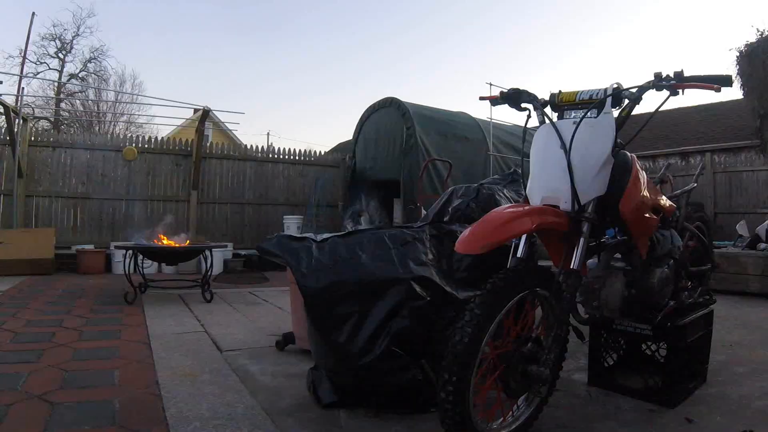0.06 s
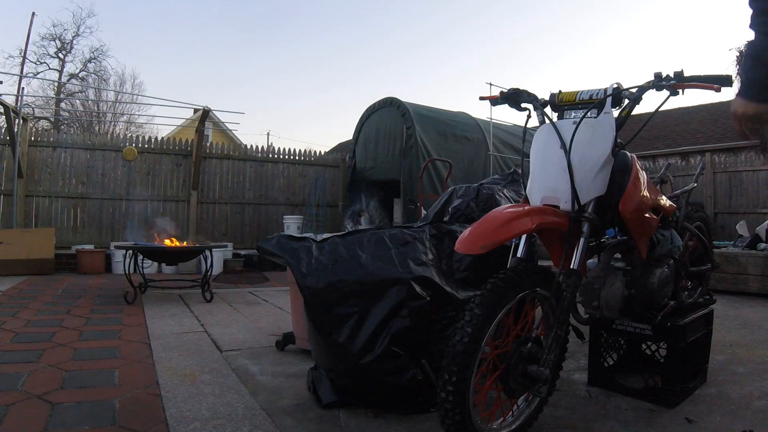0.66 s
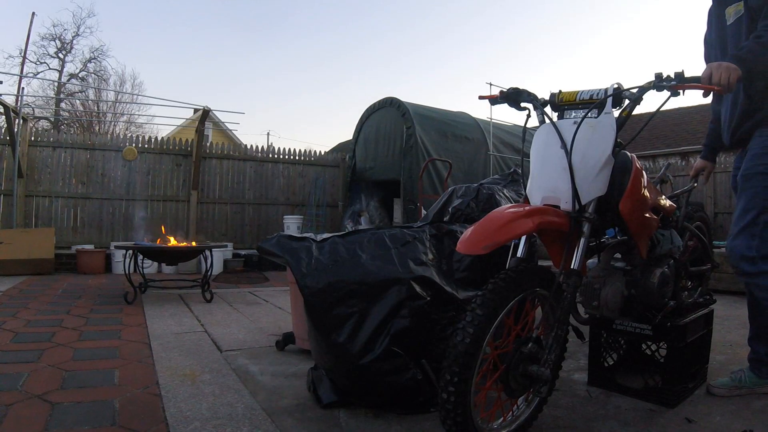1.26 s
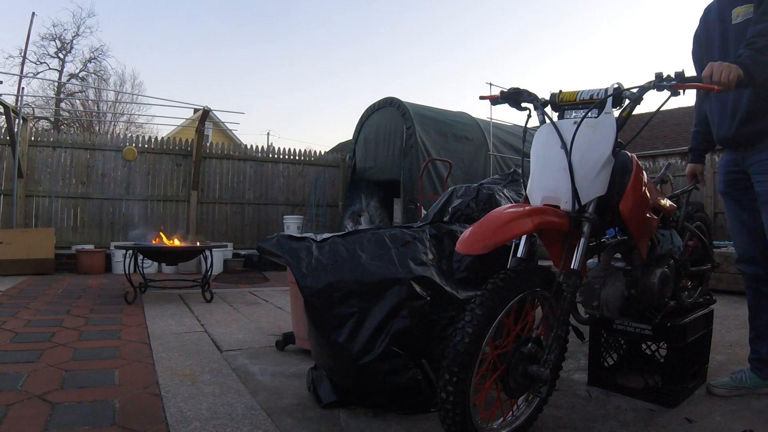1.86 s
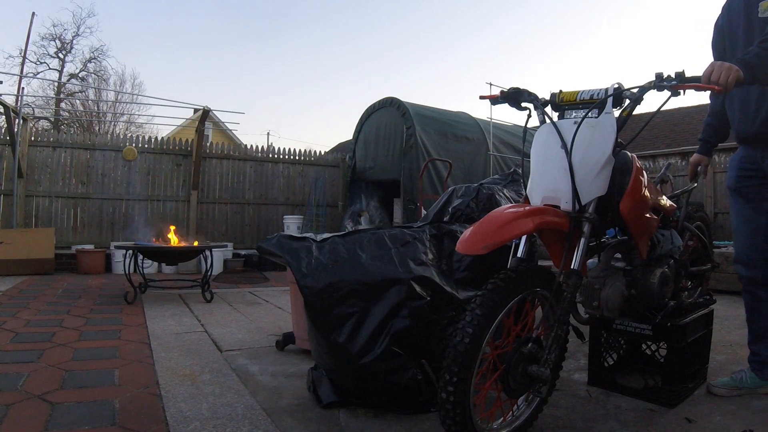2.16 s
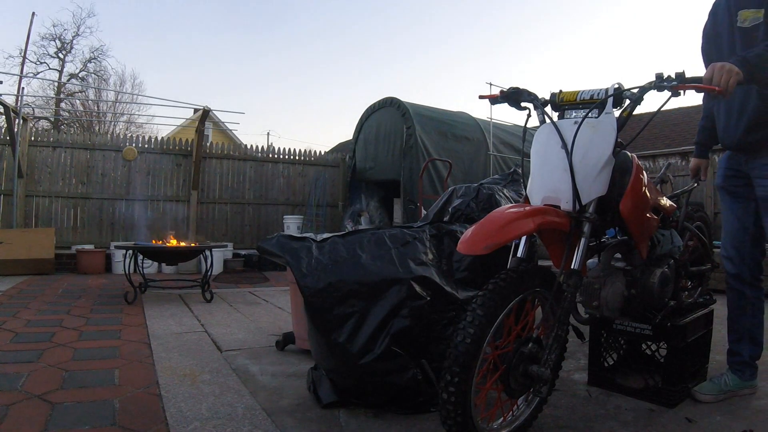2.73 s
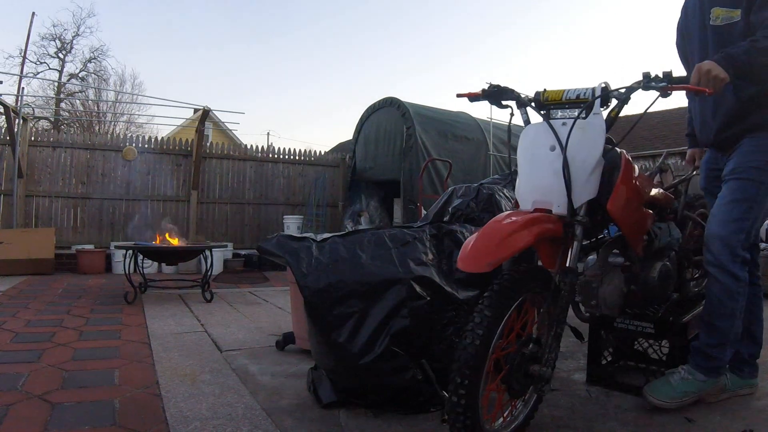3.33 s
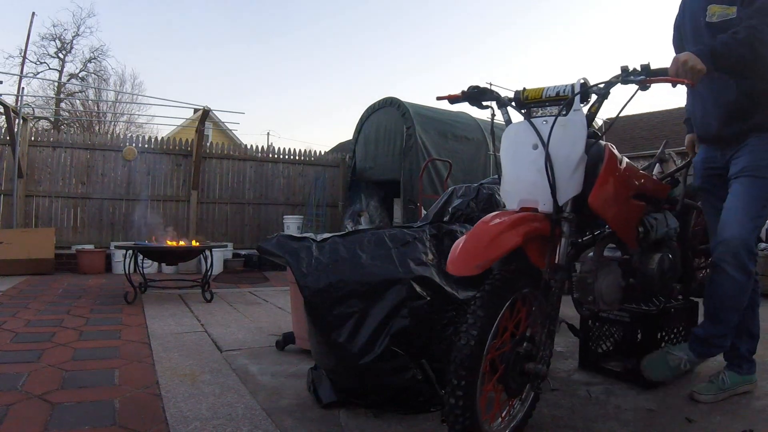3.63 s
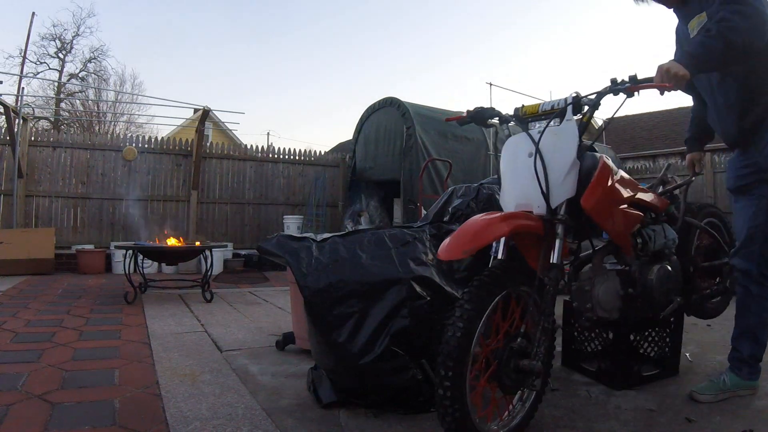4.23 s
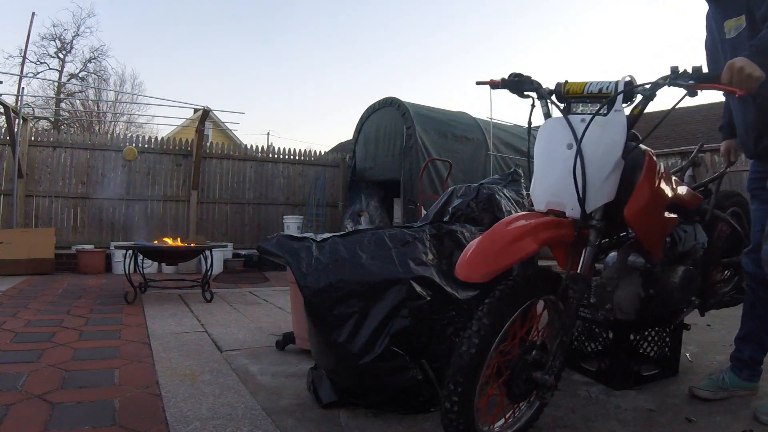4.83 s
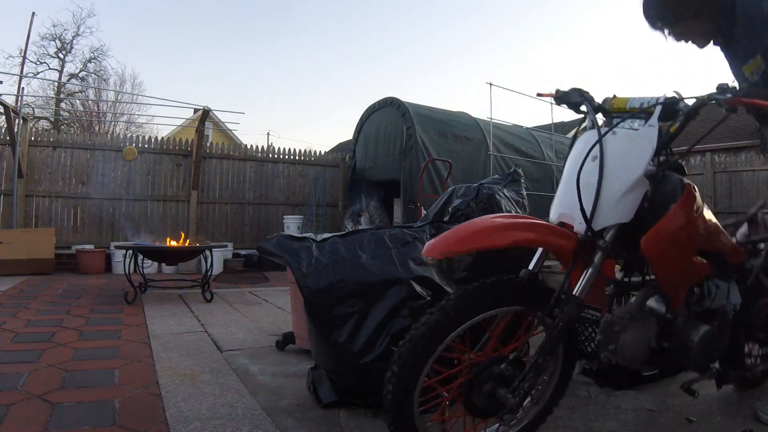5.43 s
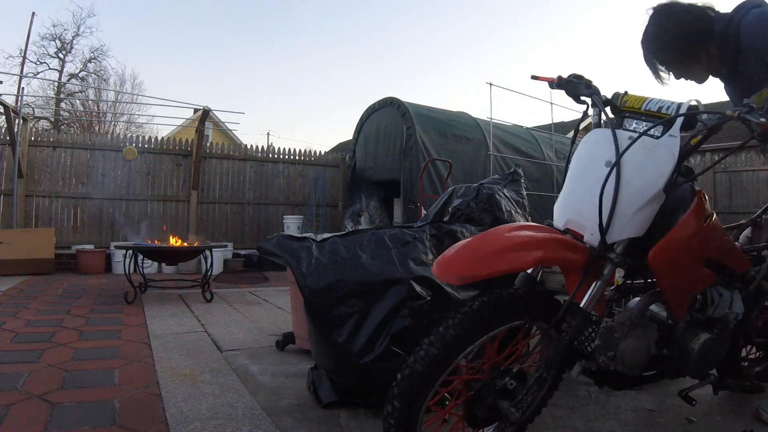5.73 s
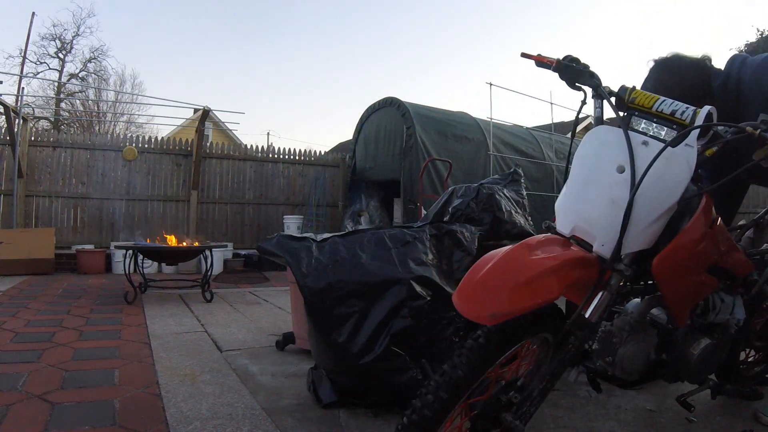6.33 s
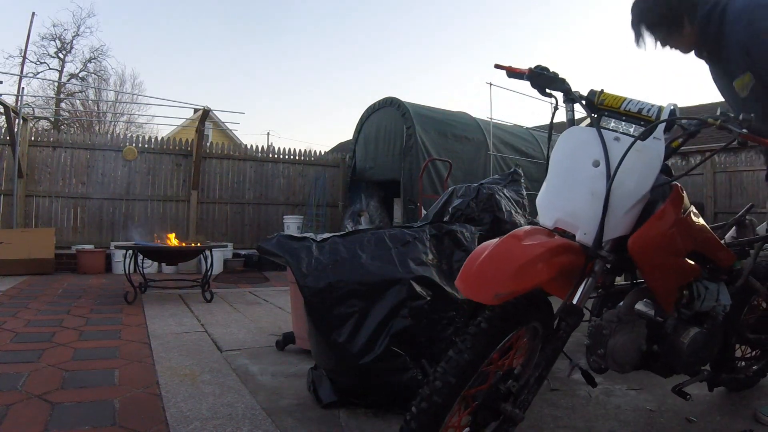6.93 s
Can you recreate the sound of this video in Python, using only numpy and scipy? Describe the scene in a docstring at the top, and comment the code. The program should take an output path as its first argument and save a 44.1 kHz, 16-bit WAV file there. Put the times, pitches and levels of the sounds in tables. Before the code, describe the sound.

A brief low bump of wind hits the microphone, then quiet yard air fades up. A hollow plastic crate is kicked and clatters from edge to edge on paving. A small dirt bike's frame clunks down on it. Shoes scuff on grit, the tyres land with a soft thump and loose metal jingles. Finally the crate is dragged with a juddering scrape and a few knocks.

```python
"""In a paved yard, a small dirt bike is lifted and a plastic crate is kicked, rocked and dragged out.
Wind bumps the microphone first; after a short silence comes a soft pop and the yard air fades up.
Shoes scuff on grit. The hollow crate rings when knocked and judders as it slides on the paving.
The bike's frame clunks on the crate, the tyres land with a dull thump and loose metal jingles."""
import sys
import numpy as np
from scipy import signal
from scipy.fft import rfft, irfft, next_fast_len
from scipy.io import wavfile

SR = 44100
rng = np.random.default_rng(int(sys.argv[2]) if len(sys.argv) > 2 else 0)


def transcribe(u):
    """Save the signal u as a 16-bit wav file named by the first command-line argument.

    u: samples, shape (n,) or (channels, n), limited to [-1, 1]; the rate is SR.
    q: integer samples, one column per channel.
    """
    v = np.clip(np.atleast_2d(u).T, -1, 1)
    q = np.round(v * 32767).astype(np.int16)
    wavfile.write(sys.argv[1], SR, q)


N = 316638
TIME = np.arange(N) / SR  # seconds since the scene began
AGE = np.arange(int(.45 * SR)) / SR  # seconds since one hit began

# Levels are relative: each sound sets its own volume. t60 is the time taken to die away by 60 dB.
# How strong each pitch is in a noise (f/Hz, level/dB):
WIND_SPECTRUM = [(6, -9), (14, 6.5), (24, 7), (42, -5.5), (62, -16), (110, -30), (170, -26.5), (220, -41),
                 (290, -19.5), (350, -26.5), (450, -30.5), (600, -40), (1500, -54), (4300, -66),
                 (5900, -60.5), (6500, -51.5), (7200, -57), (10500, -67.5), (14000, -60)]  # wind on the microphone
YARD_SPECTRUM = [(15, -47), (25, -3), (48, -0.5), (97, -12), (128, -9.5), (162, -18), (200, -17.5),
                 (243, -20), (387, -18), (543, -27), (2210, -35), (2620, -35.5), (4000, -41), (5200, -61),
                 (8800, -120)]  # outdoor air
HISS_SPECTRUM = [(3400, -11), (4200, -17.5), (5200, -10), (5900, -12), (6300, -1.5), (6550, 1.5),
                 (7100, -6), (8500, -9), (10500, -19), (13500, -7.5)]  # microphone hiss
SNAP_SPECTRUM = [(500, 4), (1800, -15.5), (3200, -17), (4200, -8), (5500, 5), (6400, 5), (7500, -5.5),
                 (10500, -12.5), (14000, -47)]  # a sharp crack
GRIT_SPECTRUM = [(500, -11.5), (1800, -3), (3200, -2.5), (4200, -9), (5500, 4), (6400, -0.5), (7500, -10),
                 (10500, -21), (14000, -48)]  # crunching grit
CLATTER_SPECTRUM = [(100, -15.5), (180, 0.5), (250, -4), (340, -0.5), (620, 5.5), (1000, -5.5),
                    (1500, -2.5), (2500, -13), (4200, -22), (5500, -7), (6400, -15), (7500, -17),
                    (10500, -29), (14000, -60)]  # the noisy part of a hit
# rubber rubbing on paving
RUB_SPECTRUM = [(200, 3.5), (600, -2.5), (2000, 0), (3300, -3), (4500, -21.0), (8000, -44)]
# the crate's rim scraping
RASP_SPECTRUM = [(120, -19), (185, 7.5), (250, -2.5), (340, 1), (470, -8.5), (620, -3), (830, 2.0),
                 (1020, 0.0), (1450, -4), (1900, -4.5), (2300, -9.5), (2800, -15.5), (4000, -20.5),
                 (6000, -54)]

# Pitch ranges (lowest f/Hz, highest f/Hz):
AIR_RANGES = [(20, 130), (130, 3500), (3500, 15000)]  # rumble, murmur, hiss
HIT_RANGES = [(90, 450), (450, 1000), (1000, 3500), (3500, 14000)]  # low, middle, upper and treble parts of a hit

# The notes a thing rings with when struck (f/Hz, level/dB, t60/s):
CRATE_NOTES = [(168.4, -2.5, 0.26), (192, -3.5, 0.49), (332.7, 2, 0.28), (353.7, -8.5, 0.42),
               (455, -18, 0.35), (474.5, -4.5, 0.2), (507, -11.5, 0.35), (573, -15, 0.074),
               (603.5, 7, 0.28), (626, 3, 0.24), (837, -8, 0.23), (933, -1, 0.17), (985, -5.5, 0.17),
               (1191, -3.5, 0.16), (1421, 3.5, 0.11), (1813, 2.5, 0.074), (1997, -0.5, 0.044),
               (2293, -7.5, 0.093), (5280, 1.5, 0.051), (5800, -4, 0.11), (6420, -2.5, 0.058)]  # hollow plastic shell
TYRE_NOTES = [(146, 13, 0.046), (191, 17, 0.055), (326, 1, 0.045), (740, 0, 0.011), (1220, -9, 0.022),
              (2270, 7.5, 0.0083), (3350, -3.5, 0.018), (5530, 0, 0.036)]  # tyre and wheel
FRAME_NOTES = [(112, -6, 0.35), (148.3, -5, 0.35), (192, -9, 0.45), (324.4, 2.5, .22), (417, 0, 0.11),
               (463, 4, 0.24), (571, -0.5, 0.35), (725.5, 0, 0.23), (813, -12.5, 0.23), (990, -14, 0.13),
               (1203, 13, 0.12), (1530, 1, 0.12), (1540, -8.5, 0.18), (1805, 2, 0.11), (2460, 0, 0.11),
               (2700, -16, 0.2), (4240, -19, 0.84), (5130, -5, 0.14), (5530, -9, 0.18), (5840, 1, 0.083),
               (6600, 0, 0.057)]  # bike frame
STEEL_NOTES = [(1770, -2, 0.11), (2590, -1, 0.08), (2830, -2, 0.11), (3490, -1, 0.089), (4360, 2.5, 0.18),
               (5380, 5, 0.16), (5830, 3, .14), (6200, -1, .07), (6370, 7, 0.087), (7300, 1, .07),
               (9250, -8.5, .06)]  # loose steel parts

# How rumble, murmur and hiss fade up (end level/dB, fade depth/dB, settling time/s)
AIR_RISES = [(-49.5, 12, 2.07), (-59, 9, 2.24), (-61.5, 23, 1.04)]
# Hard edges and grit snapping (t/s, level/dB)
SNAPS = [(0.384, -69), (0.52, -64), (0.633, -70), (0.663, -68), (1.096, -63), (1.15, -64.5), (2.932, -59),
         (3.317, -51), (3.479, -24), (3.521, -30), (4.164, -40.5), (4.476, -28), (4.638, -60),
         (5.276, -57.5), (5.598, -46), (5.874, -66), (6.109, -47.5), (6.191, -44), (6.401, -51),
         (6.657, -34.5), (6.692, -32.5), (6.842, -38.5)]

# Slides (t/s, length/s, body level/dB, grit level/dB, swell from start to end/dB):
RUBBER_SLIDES = [(.385, 0.029, -66.5, -71, 1), (4.53, 0.13, -63, -63, 7), (5.052, 0.084, -47, -42.5, -4),
                 (5.36, 0.058, -55.5, -58, -7), (5.448, 0.017, -48.5, -53.5, 3),
                 (5.585, 0.14, -46, -46, -11), (5.72, 0.17, -51.5, -46, -15.5),
                 (6.28, 0.075, -60.5, -56.5, -2)]  # shoes and tyres
CRATE_SLIDES = [(3.281, 0.054, -52, -62, -6), (3.362, 0.12, -48, -57, 2), (4.145, .115, -42.5, -49, 14.5),
                (4.254, 0.061, -35.5, -47, -2.5), (6.359, 0.063, -51, -53.5, -6),
                (6.422, 0.11, -34, -44.5, 10.5), (6.52, .19, -31, -44, -2.5), (6.819, .09, -41, -56, -8.5)]  # the crate is shoved along

# Hits; soft ones tilt down more and sound duller (t/s, level/dB, boom/dB, tilt/dB per octave):
CRATE_HITS = [(1.096, -57, -5, -3.5), (3.24, -57.5, -8, -2.5), (3.29, -49.5, 0, -4.5),
              (3.382, -46, 4, -4.5), (3.474, -34.5, 3.5, -3.5), (3.479, -25.5, -1, -1.5),
              (3.531, -22.5, -3, -6.5), (3.541, -27.5, -11, -7), (3.596, -37.5, 1, -6),
              (3.651, -20, -9.5, -6), (3.668, -27, 2.5, -4.5), (3.751, -24, -7, -6), (3.811, -29, -2, -11),
              (6.362, -52.5, 5, -2), (6.54, -30, -14, -5), (6.756, -31.5, 2, -2.5), (6.816, -32, 0, -4.5),
              (6.864, -26.5, -4.5, -6), (6.913, -36.5, 0, -13), (6.96, -55, 5, -2)]  # the crate is kicked and rocks
RUBBER_HITS = [(2.743, -47, -0.5, -4.5), (2.758, -50, 7, -5), (2.776, -52.5, 6.5, -6),
               (4.967, -53, -7, -15), (5.558, -41.5, 5, -3.5), (5.568, -44.5, 4.5, -1.9),
               (5.617, -40.5, -12, -5.5), (5.628, -44.5, -5, -3)]  # a shoe, then the tyres landing and bouncing
FRAME_HITS = [(4.079, -39, 5, -3), (4.161, -46.5, 4, -2), (4.333, -22, 1, -4.5), (4.346, -22, -3.5, -9),
              (4.476, -35, 2, -6.5)]  # the bike's weight on the crate
HIT_LEVEL_HZ = 670  # the pitch at which a hit's level is given


def undb(db):
    """Turn decibels into a number to multiply by."""
    return 10 ** (np.asarray(db) / 20)


def unit(x, count=None):
    """Scale x so its first count samples (or all of them) have an average strength (rms) of 1."""
    return x / np.sqrt(np.mean(x[:count] ** 2) + 1e-24)


def add(out, start_s, x):
    """Mix x into out from the given time."""
    i = max(int(start_s * SR), 0)
    out[i:i + len(x)] += x[:max(N - i, 0)]


def band(x, lo, hi):
    """Keep the pitches between lo and hi Hz."""
    return signal.sosfilt(signal.butter(3, [lo, hi], "band", fs=SR, output="sos"), x)


def colour(x, spectrum):
    """Turn each pitch in x up or down as the spectrum says."""
    hz, db = np.transpose(spectrum)
    size = next_fast_len(len(x))
    f = np.maximum(np.fft.rfftfreq(size, 1 / SR), 1)
    gain = undb(np.interp(np.log(f), np.log(hz), db))
    return irfft(rfft(x, size) * gain, size)[:len(x)]


def wander(rate):
    """Drift by about 1 either way, heading for a new random value rate times a second."""
    targets = rng.standard_normal(4096)
    return np.interp(TIME * rate, np.arange(len(targets)), targets)


def fade(t60):
    """Die away by 60 dB every t60 seconds."""
    return np.exp(-np.log(1000) * AGE / max(t60, 1e-3))


def grains(rate, spread_db, t60):
    """Surfaces catch and slip about rate times a second: tiny noise bursts, some bigger than others."""
    size = undb(spread_db * np.minimum(rng.exponential(size=N), 4))
    slips = (rng.random(N) < rate / SR) * size * rng.standard_normal(N)
    energy = signal.fftconvolve(slips ** 2, fade(t60) ** 2)[:N]
    return unit(np.sqrt(np.maximum(energy, 0)) * rng.standard_normal(N))


def slide_gains(slides, attack_s, t60):
    """How loud body and grit are as each slide takes hold, swells or eases off, and dies away."""
    body, grit = np.zeros((2, N))
    for start, length, body_db, grit_db, swell_db in slides:
        age = TIME - start
        rise = np.clip(age / attack_s, 0, 1)
        hold = undb(swell_db * (np.clip(age / length, 0, 1) - .5))
        release = np.exp(-np.log(1000) * np.maximum(age - length, 0) / t60)
        shape = rise * hold * release
        body = np.maximum(body, undb(body_db) * shape)
        grit = np.maximum(grit, undb(grit_db) * shape)
    return body, grit


def ring(notes, lo, hi, scatter_db, detune):
    """Sound the notes between lo and hi Hz; each spot that is struck gives a different mix."""
    out = np.zeros(len(AGE))
    for (hz, db, t60), (louder, higher, flip) in zip(notes, rng.standard_normal((len(notes), 3))):
        if lo <= hz < hi:
            wave = np.sin(2 * np.pi * hz * (1 + detune * higher) * AGE)
            out += np.sign(flip) * undb(db + scatter_db * louder) * fade(t60) * wave
    return out


def hit_levels(db, boom_db, tilt_db):
    """A hit's level in each pitch range: weight behind it adds boom, and higher ranges get weaker."""
    centres_hz = np.sqrt(np.prod(HIT_RANGES[1:], axis=1))
    octaves = np.log2(centres_hz / HIT_LEVEL_HZ)
    return [db + boom_db, *(db + tilt_db * octaves)]


def hit(notes, ranges, levels_db, clatter_db, low_t60, high_t60, echo_db, echo_t60, contact_s):
    """One hit: clear notes, a clatter of many short ones (made from noise) and the fence's echo."""
    noise = colour(rng.standard_normal(len(AGE)), CLATTER_SPECTRUM)
    onset = int(.025 * SR)  # levels are set over the first 25 ms
    out = 0
    for (lo, hi), db, t60 in zip(ranges, levels_db, np.geomspace(low_t60, high_t60, len(ranges))):
        # soft contacts and low notes build up more slowly
        rise = 1 - np.exp(-AGE * lo / HIT_LEVEL_HZ / max(contact_s, 1e-4))
        clatter = band(noise * (fade(t60) + undb(echo_db) * fade(echo_t60)), lo, hi)
        tone = ring(notes, lo, hi, scatter_db=1.76, detune=0.007)
        both = unit(tone, onset) + undb(clatter_db) * unit(clatter, onset)
        out = out + undb(db) * unit(rise * both, onset)
    return out


def wind_bump():
    """Wind bumps the microphone until the sound breaks off abruptly."""
    end_s, fade_s = 0.178, 0.0091
    return colour(rng.standard_normal(N), WIND_SPECTRUM) * np.clip((end_s - TIME) / fade_s, 0, 1)


def yard_air():
    """A low outdoor rumble, a distant murmur and thin microphone hiss all fade up."""
    start_s, opening_s = 0.31, 0.077
    age = np.maximum(TIME - start_s, 0)
    spectra = (YARD_SPECTRUM, YARD_SPECTRUM, HISS_SPECTRUM)
    layers = []
    for (db, depth_db, settle_s), spectrum, (lo, hi) in zip(AIR_RISES, spectra, AIR_RANGES):
        noise = unit(band(colour(rng.standard_normal(N), spectrum), lo, hi))
        layers.append(undb(db - depth_db * np.exp(-age / settle_s)) * noise)
    rumble, murmur, hiss = layers
    rumble *= undb(2.5 + 0.16 * wander(5.6))
    murmur *= undb(2.0 + 2.04 * wander(5.7))
    return (rumble + murmur + hiss * undb(-1.27)) * np.clip(age / opening_s, 0, 1)


def soft_pop():
    """A soft pop ends the silence."""
    out = np.zeros(N)
    add(out, .324, undb(-38.0) * band(fade(0.046), 27, 1860))
    return out


def grit_snaps():
    """Hard edges and grit snap: a bright crack as contact breaks, a duller tail and a faint echo."""
    out = np.zeros(N)
    for start, db in SNAPS:
        crack = colour(rng.standard_normal(len(AGE)), SNAP_SPECTRUM) * fade(0.02)
        tail_shape = undb(-1.5) * fade(0.03) + undb(-11.5) * fade(0.24)
        tail = colour(rng.standard_normal(len(AGE)), GRIT_SPECTRUM) * tail_shape
        add(out, start, undb(db) * unit(crack + tail, count=176))
    return out * undb(-0.34)


def rubber_scuffs():
    """Soles and tyre knobs rub and crunch on sandy paving."""
    body, grit = slide_gains(RUBBER_SLIDES, attack_s=0.014, t60=.13)
    sand = grains(rate=1800, spread_db=1.5, t60=0.024)
    rub = unit(colour(sand, RUB_SPECTRUM))
    crunch = unit(band(colour(sand, GRIT_SPECTRUM), 3030, 16000))
    return undb(-1.0) * body * rub + undb(-7.5) * grit * crunch


def crate_knocks():
    """The hollow crate is kicked and rocks from edge to edge; pressed to the ground it rings less."""
    out = np.zeros(N)
    for start, *touch in CRATE_HITS:
        pressed = any(0 <= start - shove <= length for shove, length, *_ in CRATE_SLIDES)
        notes = [(hz, db, t60 * (.55 if pressed else .85)) for hz, db, t60 in CRATE_NOTES]
        knock = hit(notes, HIT_RANGES, hit_levels(*touch), clatter_db=-3.5,
                    low_t60=0.39, high_t60=0.04, echo_db=-9.0, echo_t60=0.37, contact_s=0.0006)
        add(out, start, knock)
    return out * undb(-2.0)


def rubber_thuds():
    """A shoe, and later the tyres, meet the paving with short, dead thumps."""
    out = np.zeros(N)
    for start, *touch in RUBBER_HITS:
        thud = hit(TYRE_NOTES, HIT_RANGES, hit_levels(*touch), clatter_db=1.0,
                   low_t60=0.039, high_t60=0.028, echo_db=-9.5, echo_t60=0.37, contact_s=0.00011)
        add(out, start, thud)
    return out * undb(-1.0)


def crate_drag():
    """The crate's rim judders over the paving and makes its shell ring, while grit crackles under it."""
    body, grit = slide_gains(CRATE_SLIDES, attack_s=0.02, t60=0.22)
    grip = undb(1.7 * wander(80))
    judder = grains(rate=3800, spread_db=0.7, t60=0.005) * grip * body
    # touching the ground cuts the ringing short
    shell = ring(CRATE_NOTES, 100, 3500, scatter_db=0.0, detune=0.0014) * fade(0.15)
    tone = signal.fftconvolve(judder, shell)[:N]  # every little jolt rings the shell
    rasp = colour(judder, RASP_SPECTRUM)
    strength = np.sqrt(np.mean(body ** 2))
    scrape = strength * (undb(-4.0) * unit(tone) + undb(-2.0) * unit(rasp))
    sand = grains(rate=1900, spread_db=0.8, t60=0.045)
    crackle = unit(band(colour(sand, GRIT_SPECTRUM), 1730, 14400))
    return scrape + undb(0.1) * grit * grip * crackle


def frame_clunks():
    """The bike's frame comes down on the crate and rings."""
    out = np.zeros(N)
    for start, *touch in FRAME_HITS:
        clunk = hit(FRAME_NOTES, HIT_RANGES, hit_levels(*touch), clatter_db=3.5,
                    low_t60=0.1, high_t60=0.13, echo_db=-11.5, echo_t60=0.42, contact_s=0.00047)
        add(out, start, clunk)
    return out * undb(-1.9)


def metal_jingle():
    """Loose steel parts chatter after the landing, each clink weaker and at a slightly different pitch."""
    start_s, gap_s, spread_s = 5.719, .0185, .004
    first_db, fall_db_per_s = np.array([-42.5, -34]), np.array([28, 119])  # upper and treble ranges
    out = np.zeros(N)
    for k, chance in enumerate(rng.standard_normal(size=7)):
        age = k * gap_s + min(k, 1) * spread_s * chance
        shifts = 1 + 0.0171 * rng.standard_normal(len(STEEL_NOTES))
        notes = [(hz * shift, db, t60) for (hz, db, t60), shift in zip(STEEL_NOTES, shifts)]
        clink = hit(notes, HIT_RANGES[2:], first_db - age * fall_db_per_s, clatter_db=-5.0,
                    low_t60=0.06, high_t60=0.23, echo_db=-24, echo_t60=.22, contact_s=0.0004)
        add(out, start_s + age, clink)
    return out * undb(-5.5)


def scene():
    """All the sounds add up at one microphone."""
    background = wind_bump() + yard_air() + soft_pop()
    ground = grit_snaps() + rubber_scuffs()
    handling = crate_knocks() + rubber_thuds() + crate_drag() + frame_clunks() + metal_jingle()
    return (background + ground + handling)[None]


def record(dry):
    """The microphone dulls the highest treble, and the very top is cut off."""
    dull_hz, top_hz = 11300, 15000
    dull = signal.sosfilt(signal.butter(6, dull_hz, fs=SR, output="sos"), dry)
    return signal.sosfilt(signal.ellip(8, .2, 70, top_hz, fs=SR, output="sos"), dull)


dry = scene()
out = record(dry)
transcribe(out)
```